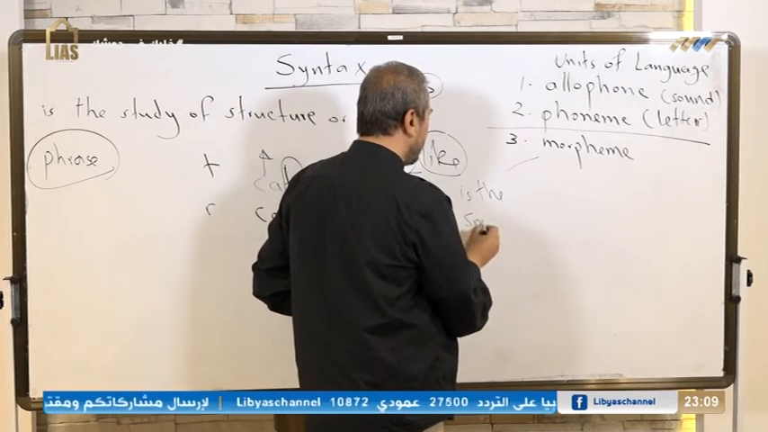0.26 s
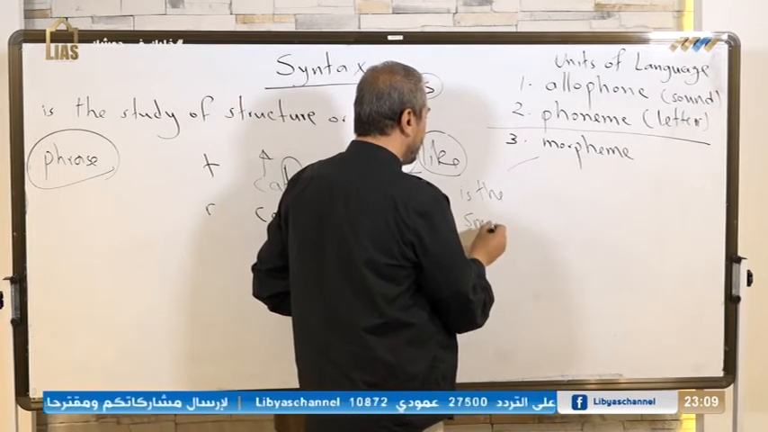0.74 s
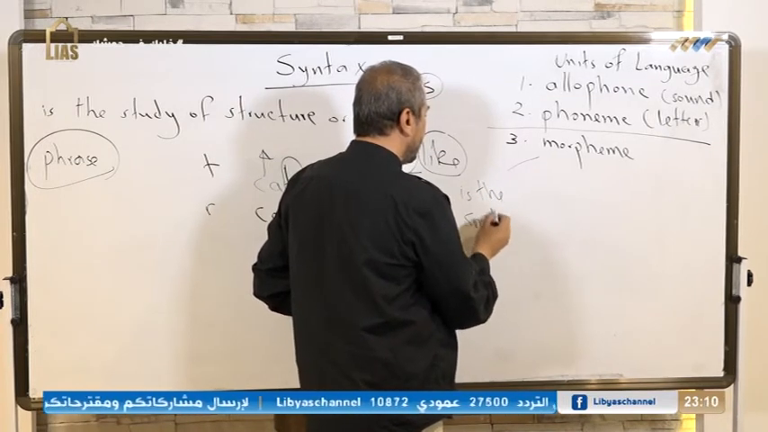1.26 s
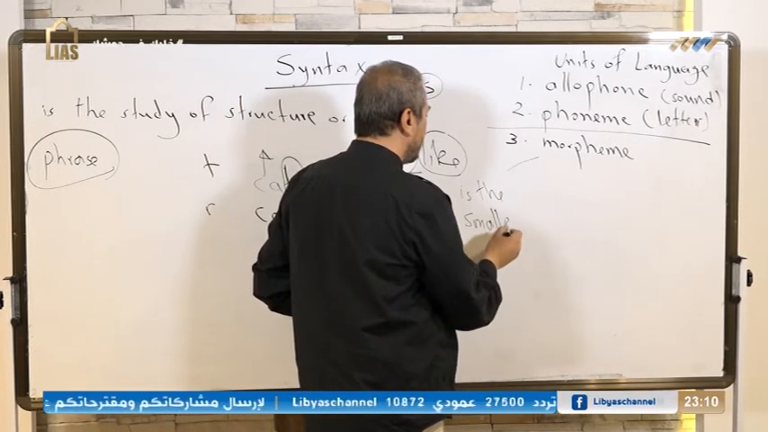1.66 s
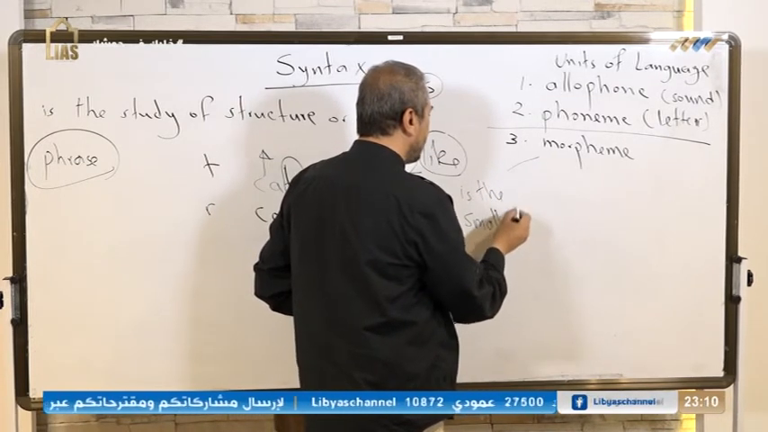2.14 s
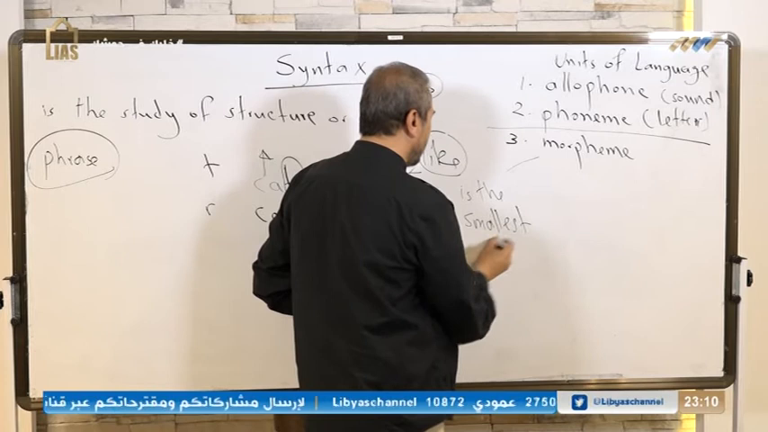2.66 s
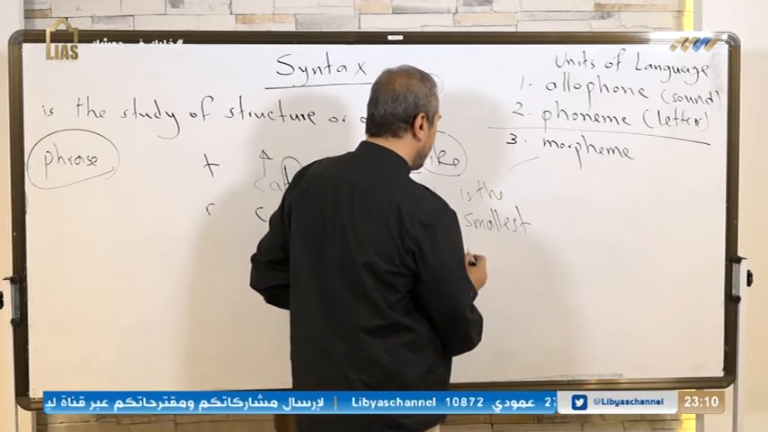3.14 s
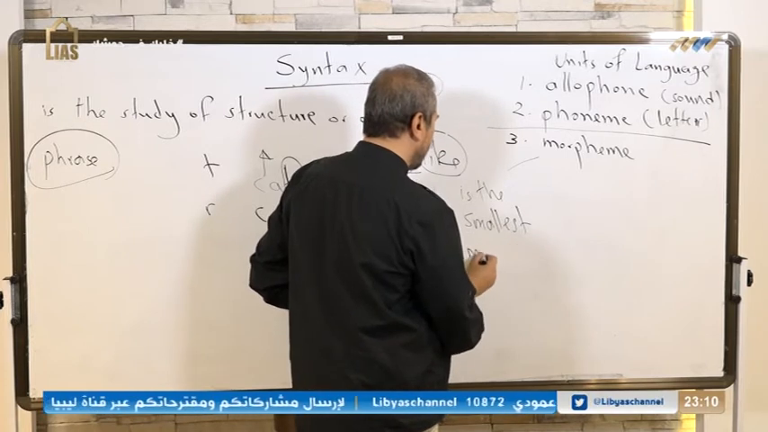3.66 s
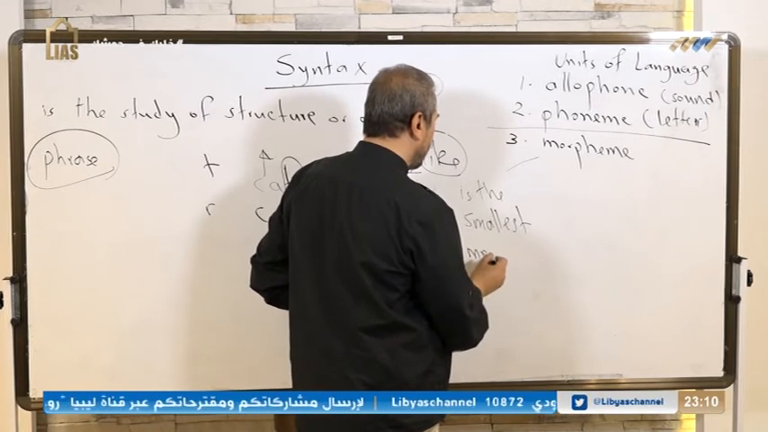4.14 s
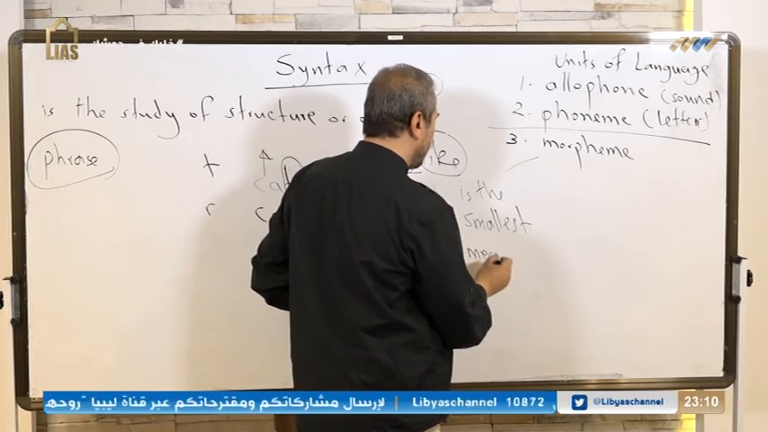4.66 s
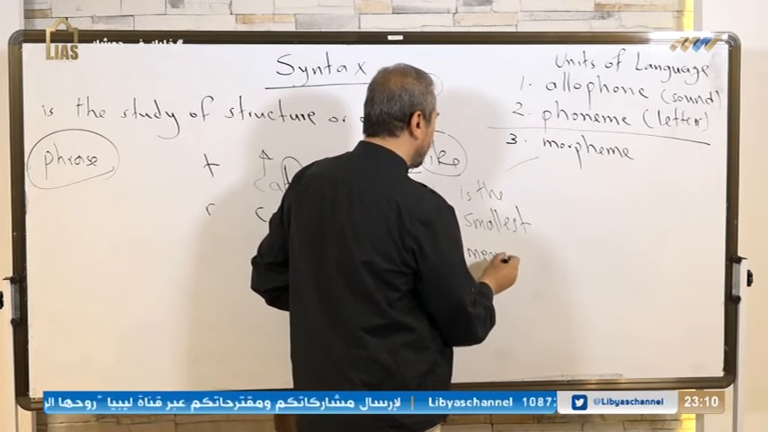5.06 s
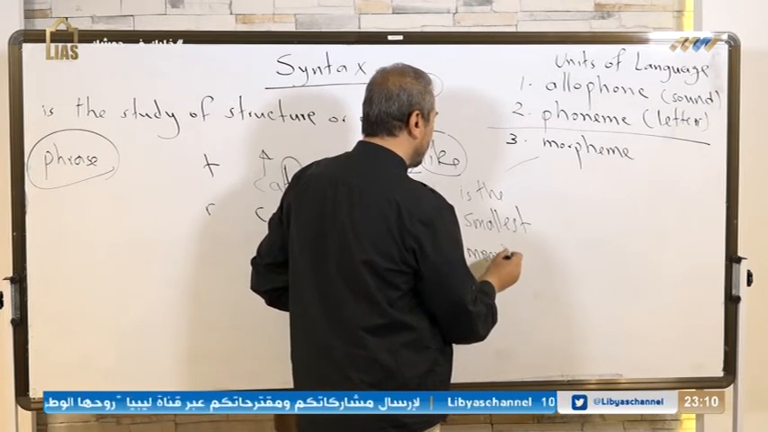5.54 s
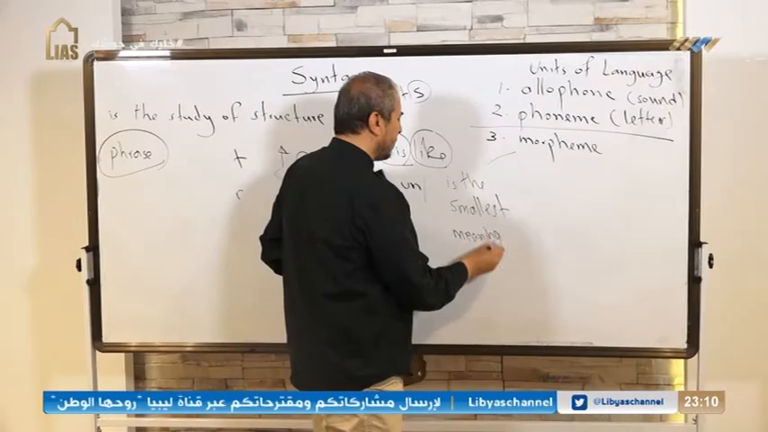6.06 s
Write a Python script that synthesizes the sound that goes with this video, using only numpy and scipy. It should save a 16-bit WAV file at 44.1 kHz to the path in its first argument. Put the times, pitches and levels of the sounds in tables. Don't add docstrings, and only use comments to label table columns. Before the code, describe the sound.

A man writes on a large whiteboard with a felt marker, heard through a close clip-on microphone in a quiet room. Irregular low thumps ring the hollow panel, joined by short faint felt hisses and occasional plastic ticks. A brief lull separates two words; then writing resumes with sharper ticks. Near the end the hand drags and the frame groans softly. Low air rumble and slight hiss lie beneath.

```python
import sys
import numpy as np
from scipy import signal
from scipy.fft import rfft, irfft
from scipy.io import wavfile
from scipy.ndimage import uniform_filter1d

SR = 44100
rng = np.random.default_rng(int(sys.argv[2]) if len(sys.argv) > 2 else 0)


def magnitude_from_level(level_db):
    exponent = np.asarray(level_db, float) / 20
    return 10 ** exponent


def transcribe(signal):
    frames = np.atleast_2d(signal).T
    limited = np.clip(frames, -1, 1)
    pcm = np.round(limited * 32767).astype(np.int16)
    wavfile.write(sys.argv[1], SR, pcm)


N = 277945
TIME = np.arange(N) / SR


def level(x, db):
    return x * magnitude_from_level(db) / np.sqrt(np.mean(x ** 2))


def band(x, hz, width):
    return signal.lfilter(*signal.iirpeak(min(hz, 0.45 * SR), hz / width, SR), x)


def walk(rate):
    hold = int(SR / rate)
    steps = np.repeat(rng.standard_normal(N // hold + 1), hold)
    return 1.6 * uniform_filter1d(uniform_filter1d(steps, hold), hold)[:N]


def ring(modes, t):
    out = 0
    for hz, db, t60, side in modes:
        decay = 1000 ** (-t / max(t60, 0.004))
        out = out + np.sign(side) * magnitude_from_level(db) * np.sin(2 * np.pi * hz * t) * decay
    return out


def add(out, s, sound):
    i = int(s * SR)
    out[i:i + len(sound)] += sound[:N - i]


def complex_noise(n):
    return np.array([1, 1j]) @ rng.standard_normal((2, n))


def rub(slips, hz, width):
    slow = signal.sosfilt(signal.butter(2, width / 2, fs=SR, output="sos"), slips)
    phase = 2 * np.pi * np.cumsum(hz + 0 * slips.real) / SR
    return level(np.real(slow * np.exp(1j * phase)), 0)


def gate(s, length, fade):
    return np.clip(np.minimum(TIME - s + fade, s + length + fade - TIME) / fade, 0, 1)


def taps():
    # start in seconds, peak in dB, stiff modes in dB,
    # high modes in dB, slap in dB.
    landings = [(0.4577, -20.5, 5.5, -1.5, 3.5), (0.9761, -16.5, 5.5, 4.5, 3.5),
                (1.2461, -27.5, 2.5, -7, -12), (1.4264, -46, 8, 13.5, -5), (1.4746, -16, 6.5, 3.5, -0.5),
                (1.814, -17.5, 7, 3, 0.5), (2.1777, -16.5, 6.5, 4, 0), (2.376, -38, -4, 2, 0),
                (2.4171, -20, 7, 4, 1), (2.9847, -17, 0, 7.5, 4.5), (3.2161, -38, 2.5, 15, 7),
                (3.4687, -42.5, -1, 17, 5), (3.7753, -23.5, -5, 2, -3.5), (4.174, -21.5, -1, 2.5, -4),
                (4.3496, -42.5, 2, 17, -3), (4.4643, -38.5, -11, 13, 4), (4.6196, -20.5, -2.5, 4, -5),
                (4.855, -39.5, 1, 15, 4), (5.0578, -18, -0.5, 6.5, -3), (5.2642, -16, 3, 5, -1),
                (5.75, -24.5, -1.5, 2.5, -6)]
    # frequency in Hz, level in dB, t60 in seconds,
    # sign of the mode at the listening point.
    panel = [(66.6, -34.5, 0.51, 1), (75.96, -19.5, 0.4, -1), (84.64, -22.5, 0.74, 1),
             (91.1, -17.5, 0.23, 1), (94.2, -32, 1, 1), (110.4, -18, 0.24, 1), (120.3, -30.5, 0.71, 1),
             (140.7, -29, 0.88, 1), (145.3, -3, 0.064, 1), (145.1, -21.5, 0.82, -1), (160.9, -25, 0.73, 1),
             (163.26, -20.5, 0.51, -1), (166.2, -26.5, 0.89, -1), (175, -24.5, 0.26, 1),
             (182.6, -25.5, 0.59, -1), (215, -28, 0.74, -1), (226.6, -21, 0.31, 1), (226.7, -2, 0.05, -1),
             (232.7, -35, 1, 1), (233.2, -29, 0.75, -1), (258.3, -26.5, 0.52, -1), (346.5, -16, 0.12, 1),
             (357, -30, 0.66, 1), (382, -19, 0.068, -1)]
    # frequency in Hz, level in dB, t60 in seconds, sign.
    panel_high = [(503, -29, 0.24, 1), (530.6, -23.5, 0.082, -1), (459, -34, 0.055, 1),
                  (613.4, -24, 0.039, -1), (657, -49, 0.64, 1), (699, -33, 0.064, 1),
                  (765, -36.5, 0.072, -1), (960, -32.5, 0.062, 1), (1120, -44, .025, -1)]
    # frequency in Hz, level in dB, t60 in seconds, sign.
    air_slap = (290, -7, .016, -1)
    # frequency in Hz,
    # level in dB, t60 in seconds, sign.
    sway = (44, -27, .2, 0)
    # frequency in Hz, t60 in seconds, level in dB.
    room = [(103, 0.41, -28.5), (199, 0.6, -24.5), (430, 0.13, -63), (640, 0.34, -47.5),
            (1000, 0.18, -52.5)]
    contact_s, build_s = 0.0017, 0.044
    firm_db, deep_per_db, middle_db, middle_per_db = -16.5, -0.2, 2.04, 0.12

    t = TIME[:SR // 2 + SR // 4]
    push = np.hanning(int(contact_s * SR) + 2)
    push = push / push.sum()

    def struck(modes):
        return np.convolve(ring(modes, t), push)[:len(t)]

    thud = [m for m in panel if m[2] < 0.06]
    ringing = [m for m in panel if m not in thud]
    edges_hz = (0, 100, 200, 300, 1000)
    deep, body, middle, stiff = (struck([m for m in ringing if lo <= m[0] < hi])
                                 for lo, hi in zip(edges_hz, edges_hz[1:]))
    direct, high, crisp = struck(thud), struck(panel_high[:2]), struck(panel_high[2:])
    slap = struck([air_slap])
    rocking = ring([sway], t)

    noise = rng.standard_normal((len(landings), len(t)))
    tails = 0
    for hz, t60, db in room:
        diffuse = level(band(band(noise, hz, hz), hz, hz), 0)
        tails = tails + magnitude_from_level(db) * 1000 ** (-t / t60) * diffuse
    tails = tails * (1 - np.exp(-t / build_s))

    out = np.zeros(N)
    for (s, db, stiff_db, high_db, slap_db), tail in zip(landings, tails):
        thump = direct + body + rocking + tail + magnitude_from_level(slap_db) * slap
        thump = thump + magnitude_from_level(deep_per_db * (db - firm_db)) * deep
        thump = thump + magnitude_from_level(middle_db + middle_per_db * stiff_db) * middle
        thump = thump + magnitude_from_level(stiff_db) * stiff + magnitude_from_level(high_db) * high
        thump = thump + magnitude_from_level(high_db + 1.3 * stiff_db) * crisp
        add(out, s, magnitude_from_level(db + 1.0) * thump)
    return out


def felt():
    # middle in seconds, length
    # in seconds, hiss in dB, lower squeak band in dB.
    strokes = [(0.05, 0.071, -68.5, 1.5), (0.286, 0.045, -62, -3), (0.569, 0.06, -65.5, -1),
               (0.689, 0.026, -64.5, 0.5), (0.764, 0.044, -66, -2.5), (1.054, 0.1, -65, -4),
               (1.333, 0.071, -64.5, -7), (1.432, 0.018, -69, 4), (1.52, 0.17, -71, 1),
               (1.656, 0.073, -63, -7), (1.829, 0.027, -67, 3.5), (1.942, 0.074, -65, -6),
               (2.276, 0.12, -66.5, -16), (2.43, 0.029, -69.5, 0),
               (3.031, 0.07, -67.5, -3), (3.158, 0.057, -69, 0), (3.271, 0.086, -64.5, 0),
                  (3.402, 0.069, -67.5, -1.5), (3.524, 0.059, -64, -7), (3.89, 0.097, -70, -12),
                  (4.008, 0.071, -62.5, -9), (4.19, 0.017, -68.5, 3), (4.285, 0.054, -62.5, -7),
                  (4.391, 0.059, -68.5, 4), (4.48, 0.032, -68, 2), (4.687, 0.046, -63.5, -6),
                  (4.799, 0.042, -69, -3), (4.899, 0.047, -64.5, -3), (5.098, 0.041, -65.5, -7),
                  (5.398, 0.046, -65, -22), (5.512, 0.064, -70.5, -2), (5.598, 0.047, -68, -1),
                  (5.768, 0.022, -65.5, -7), (5.863, 0.051, -64, -13), (5.964, 0.05, -67, 0),
                  (6.083, 0.13, -68, -7)]
    # time in seconds, lean from 0 to 1.
    pen_lean = [
        (0, .1),
        (1.4, .25),
        (1.6, .7),
        (2.3, .55),
        (3.0, .95),
        (4.4, .85),
        (4.9, .5),
        (5.15, .15),
        (6.3, .25),
    ]
    # offset in Hz, width in Hz, level in dB.
    nib_mid = [(-1000, 1800, -1), (0, 1200, -1), (900, 1900, -3)]
    # frequency in Hz, width in Hz, level in dB.
    nib_low = [(1976, 300, -5), (2968, 1200, 1)]
    # frequency in Hz, width in Hz, level in dB.
    nib_top = [(8410, 830, 0.011), (9230, 770, -0.35)]
    upright_hz, lean_hz, lean_top_db = 6540, 653, -12
    speed_hz, narrowing, patchy_db = 400.6, 0.74, 2.5

    s, length, hiss_db, low_db = np.transpose(strokes)
    lean = np.interp(s, *np.transpose(pen_lean))
    nearest = np.searchsorted((s[1:] + s[:-1]) / 2, TIME)
    speed = np.exp(-np.abs((TIME - s[nearest]) / (0.61 * length[nearest])) ** 3.2)
    centre_hz = (upright_hz - lean_hz * lean)[nearest] + speed_hz * (speed - 0.8)
    groups = [(nib_mid, centre_hz, 0, -84),
              (nib_low, 0, low_db - 1.0, -84),
              (nib_top, 0, lean_top_db * lean + 0.37, -86)]
    out = 0
    for modes, shift_hz, db, rest_db in groups:
        nib = 0
        for hz, width, mode_db in modes:
            size_db = 1.6 * np.repeat(rng.exponential(size=N // 8 + 1), 8)[:N]
            slips = complex_noise(N) * magnitude_from_level(size_db)
            patches = magnitude_from_level(mode_db + patchy_db * walk(30))
            nib = nib + patches * rub(slips, hz + shift_hz + 130 * walk(12), narrowing * width)
        stroke = magnitude_from_level(hiss_db + db + 0.5)[nearest] * speed
        rest = magnitude_from_level(rest_db + 2 * walk(9))
        out = out + level(nib, 0) * (stroke + rest)
    return out


def ticks():
    # start in seconds, barrel in dB, nib holder in dB, crack in dB,
    # nib holder frequency in Hz.
    mid_stroke = [(.1342, -56.5, -54, -70, 2600), (0.2497, -67, -57, -93, 2770),
                  (1.112, -56, -54.5, -67, 2770), (1.2872, -59, -60, -84, 2640),
                  (1.4263, -60, -68, -66.5, 2500), (2.2637, -88, -67, -63, 2600),
                  (3.1147, -46.5, -52.5, -73, 2440), (3.2163, -42.5, -45.5, -58, 2730),
                  (3.4691, -57, -55, -73, 3060), (4.033, -85, -55, -83, 2600),
                  (4.3482, -43.5, -44.5, -58.5, 2980), (4.462, -49.5, -58, -52, 2370),
                  (4.8552, -46, -53.5, -65.5, 2520), (5.279, -47, -48.5, -68.5, 2750)]
    # start in seconds, level in dB.
    knocks = [
        (.4585, -56),
        (0.978, -56),
        (2.4175, -57.5),
        (2.9872, -51.5),
        (4.175, -55),
        (4.62, -54.5),
        (5.264, -52),
    ]
    # frequency in Hz, level in dB, t60 in seconds, sign.
    barrel = [(1916, -1.5, 0.011, 1), (2126, -10, 0.014, -1), (760, -13, 0.045, 1), (1124, -16, 0.027, -1)]
    # frequency in Hz, level in dB, t60 in seconds, sign.
    cap = (1350, -54.5, .035, 1)

    t = TIME[:SR // 20]
    out = np.zeros(N)
    add(out, 1.4263, ring([cap], t))
    rows = mid_stroke + [(s, db, db - 12, db - 28, 2600) for s, db in knocks]
    chance = rng.standard_normal((len(rows), 2, len(t)))
    for (s, barrel_db, holder_db, crack_db, hz), (slip, snap) in zip(rows, chance):
        holder = ring([(hz, 0, 0.014, 1), (0.863 * hz, -2, 0.009, -1), (1.17 * hz, -4, 0.008, -1),
                       (1.75 * hz, -9, 0.006, 1), (2.2 * hz, -12, 0.005, -1)], t)
        rings = magnitude_from_level(barrel_db + 7) * ring(barrel, t) + magnitude_from_level(holder_db + 5.5) * holder
        onset = 1 - np.exp(-t / 0.00042)
        ragged = (1 + 0.41 * uniform_filter1d(slip, size=12)) * onset
        crack = band(snap * np.exp(-t / 0.00066), 7000, 5500)
        add(out, s, rings * ragged + magnitude_from_level(crack_db + 25.0) * crack)
    return out


def drag():
    # start in seconds, length in seconds, level in dB, centre in Hz, half width in Hz.
    slides = [(0.0, 0.14, -58.5, 160, 40), (0.103, .27, -57, 405, 50), (2.603, .22, -60, 160, 40.15),
              (2.633, 0.14, -68.5, 1950, 300), (3.265, 0.15, -56.5, 160, 40),
              (3.433, 0.16, -62.5, 160, 39.6), (5.502, 0.2, -60, 160, 39.6), (5.544, 0.15, -67, 1000, 493),
              (5.789, .16, -53, 269.5, 70), (5.901, 0.23, -53.5, 160, 39.6), (6.193, 0.1, -52, 160, 40)]
    sag_db, fade_s = -8, 0.034
    out = np.zeros(N)
    for s, length, db, hz, width in slides:
        near = slice(max(int(s * SR) - SR // 10, 0), int((s + length) * SR) + SR // 10)
        sag = sag_db * np.clip((TIME - s) / length, 0, 1)
        shape = (gate(s, length, fade_s) * magnitude_from_level(db + sag))[near]
        out[near] += shape * rub(complex_noise(SR), hz, 2 * width)[:len(shape)]
    return out


def groan():
    # middle in seconds, length in seconds, level in dB, top pitch in Hz.
    leans = [
        (5.86, .14, -54, 250),
        (6.05, .12, -52.5, 283),
        (6.26, .11, -53, 281),
    ]
    rest_hz, width_hz = 232, 40
    middle, length, db, top_hz = np.transpose(leans)
    effort = np.array([np.exp(-((TIME - s) / (0.55 * long)) ** 2) for s, long in zip(middle, length)])
    pitch_hz = rest_hz + (top_hz - rest_hz) @ effort
    return magnitude_from_level(db) @ effort * rub(complex_noise(N), pitch_hz, width_hz)


def room_tone():
    # frequency in Hz, density in dB per Hz.
    air = [(12, -30), (20, 3), (64, -1.5), (113, -7.5), (155, -8), (253, -10), (303, -16.5), (354, -12.5),
           (403, -17.5), (711, -20), (946, -22.5), (1630, -27.5), (4350, -30), (6090, -31), (9710, -27.5),
           (12600, -58), (21400, -120)]
    hz, db = np.transpose(air)
    grid = np.maximum(np.fft.rfftfreq(N, 1 / SR), 1)
    colour = level(magnitude_from_level(np.interp(np.log(grid), np.log(hz), db)), -56)
    out, swell = 0, walk(0.5)
    for centre in 24 * 2.0 ** np.arange(9):
        share = np.cos(np.pi / 2 * np.clip(np.log2(grid / centre), -1, 1))
        noise = irfft(rfft(rng.standard_normal(N)) * colour * share, N)
        unsteady = 1 / (1 + centre / 300)
        out = out + noise * magnitude_from_level(unsteady * (0.8 * swell + 2.2 * walk(6)))
    return out


def electrical_lines():
    # start in seconds, length in
    # seconds, level in dB.
    tone_spells = [
        (4.104, 0.034, -70),
        (4.162, 0.11, -68.5),
        (4.333, .06, -66.5),
        (4.42, 0.38, -73.5),
        (5.6, 0.14, -71),
        (5.78, 0.04, -61),
        (5.855, 0.035, -67),
        (5.917, .07, -67),
        (6.04, 0.031, -65),
        (6.11, 0.21, -74),
    ]
    # frequency in Hz, level in dB.
    mains = [(24, -66), (49, -63.5), (948, -79.5), (1047, -85), (1147, -92.5), (1447, -86)]
    whine_hz, rest_db, fade_s = 1000, -85, 0.011
    spells = magnitude_from_level(rest_db + 4 * walk(2.9))
    for s, length, db in tone_spells:
        spells = spells + magnitude_from_level(db) * gate(s, length, fade_s)
    tone = np.sin(2 * np.pi * whine_hz * TIME + 0.88 * walk(3.6))
    whine = spells * magnitude_from_level(-1.5 + 0.59 * walk(18)) * tone
    hum = sum(magnitude_from_level(db + 1.2 * walk(1)) * np.sin(2 * np.pi * hz * TIME) for hz, db in mains)
    return whine + hum


def scene():
    marker = taps() + felt() + ticks()
    writer = drag() + groan()
    return (marker + writer + room_tone() + electrical_lines())[None]


def top_cut(x):
    return signal.sosfilt(signal.butter(12, 9860, fs=SR, output="sos"), x)


def record(dry):
    cut = signal.sosfilt(signal.ellip(12, 0.2, 85, 9850, fs=SR, output="sos"), dry)
    return top_cut(cut)


dry = scene()
out = record(dry)
transcribe(out)
```